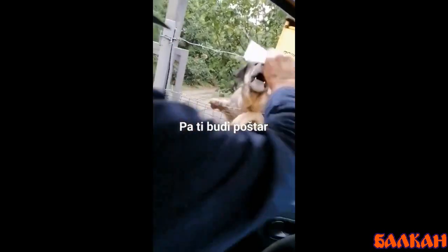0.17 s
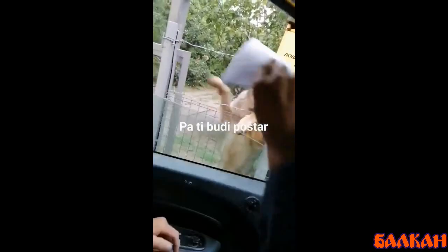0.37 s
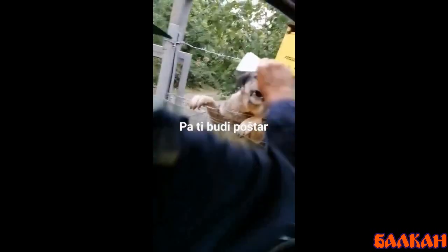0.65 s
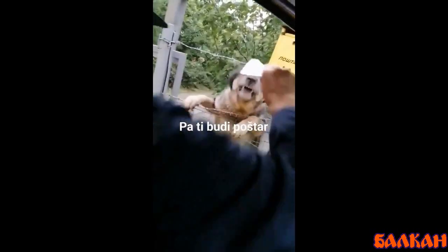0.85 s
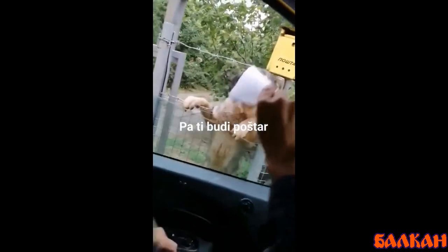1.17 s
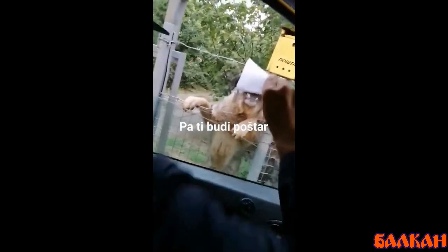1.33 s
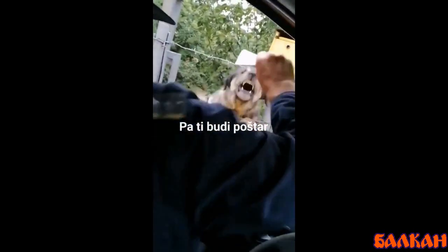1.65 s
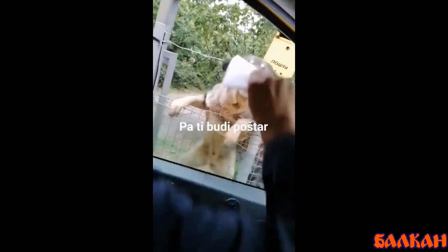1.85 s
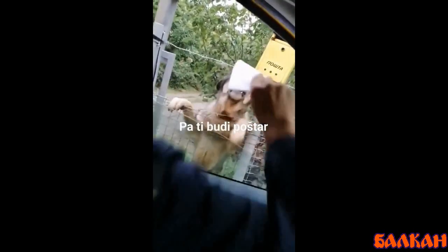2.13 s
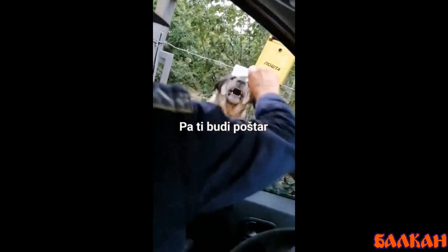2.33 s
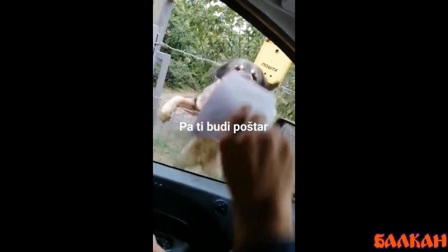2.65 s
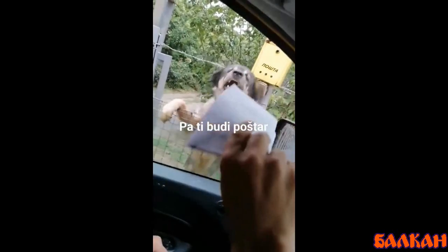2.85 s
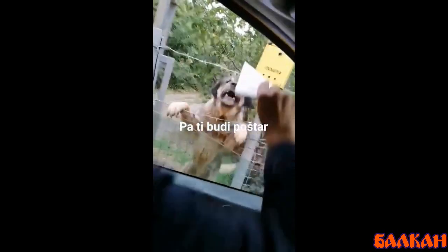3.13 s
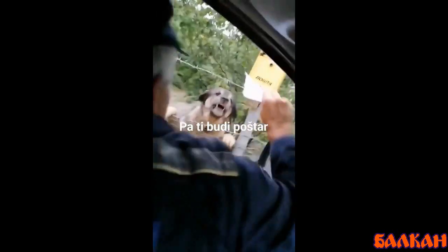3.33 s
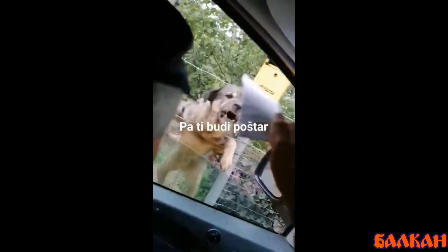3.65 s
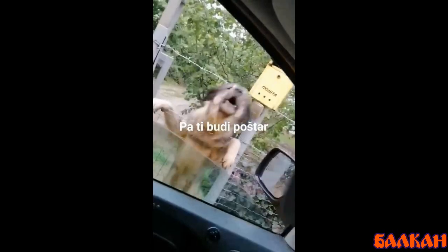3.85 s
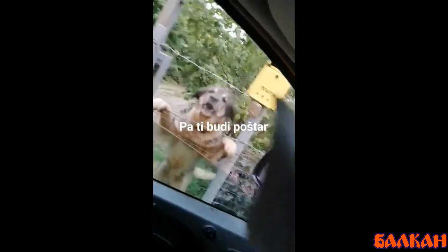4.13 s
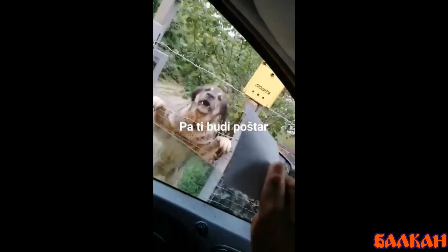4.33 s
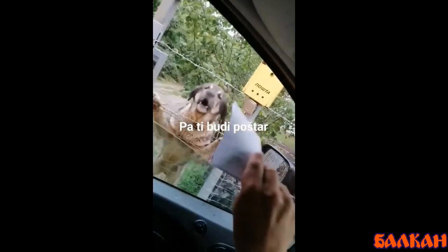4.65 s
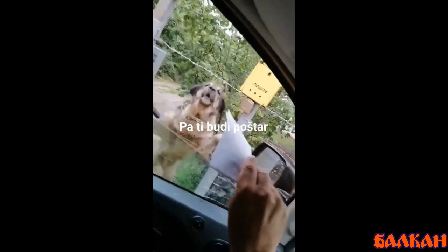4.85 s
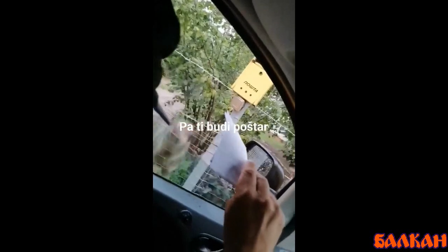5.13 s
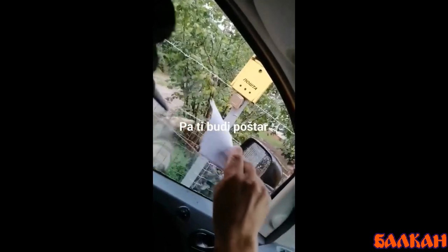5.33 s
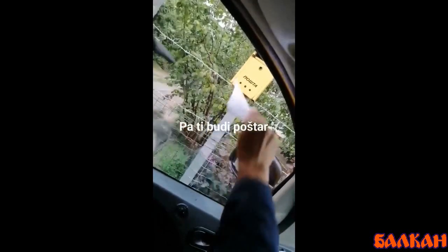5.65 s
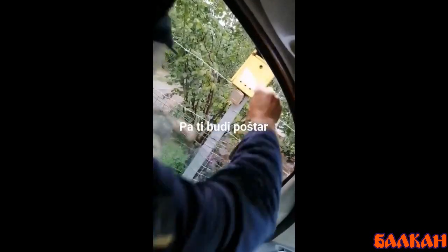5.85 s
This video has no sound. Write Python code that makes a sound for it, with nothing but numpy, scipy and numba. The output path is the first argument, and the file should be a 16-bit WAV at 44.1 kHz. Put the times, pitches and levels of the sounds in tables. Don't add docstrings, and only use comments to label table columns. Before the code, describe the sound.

A large dog snarls close outside the open window of an idling car. The first 0.3 seconds hold only quiet engine throb, street hiss and soft claw scrapes on wire. From 0.35 to 1.5 the growl surges in rough, uneven bursts, throat slapping and clicking, teeth hissing. After a short lull it returns from 1.8 to about 3.2, coarse and airy, with low falling gulps at 2.15 and 3.1 and small wire ticks around 2.7 and 2.9. Another growl builds from 3.4 into the first short, pitched bark at 3.9. Weaker grumbles follow, with a wire tick at 4.6, then barks at 4.85, 5.2 and 5.6, each about a sixth of a second, arching and dropping. The hand-held stereo phone catches tight cabin reflections; the dog's lows shift sides, often leaning left, loud peaks are rounded, and the background ducks beneath its voice.

```python
import sys
import numpy as np
from scipy import signal
from scipy.fft import rfft, irfft
from scipy.io import wavfile
from scipy.ndimage import uniform_filter1d, minimum_filter1d, map_coordinates
from numba import njit

SR = 44100
rng = np.random.default_rng(int(sys.argv[2]) if len(sys.argv) > 2 else 0)


def master(y):
    cut = np.clip(np.atleast_2d(y).T, -1, 1)
    pcm = np.round(cut * 32767)
    wavfile.write(sys.argv[1], SR, pcm.astype(np.int16))


def to_linear_factor(level_db):
    exponent = np.asarray(level_db, float) / 20
    return 10 ** exponent


N = 263718
TIME = np.arange(N) / SR

# (time [s], throat resonance [Hz], left over right [dB])
HEAD_MOVES = [(0.0, 477, 1.5), (0.28, 520, -1.0), (0.32, 550, 5.5), (0.68, 460, 12.5), (1.53, 543, 4.5),
              (1.58, 370, -1), (1.85, 570, 0.5), (2.27, 444, 13), (2.68, 545, 3), (2.71, 474, 5),
              (3.33, 514, 5), (3.36, 422, 1.5), (3.61, 520, 0.5), (3.93, 435, 6), (4.38, 464, -10),
              (4.96, 400, 3), (5.93, 401, 1), (5.98, 393, -12)]
# (centre [Hz], width [Hz], level [dB])
MOUTH_PEAKS = [(921, 130, 2), (1073, 69, 4), (1256, 124, -3), (1414, 240, -4)]
# (start [s], length [s], top pitch [Hz], level [dB], overtones [dB])
BARK_EVENTS = [
    (3.912, .16, 455, -9.5, -28),
    (4.856, 0.19, 432, -13.5, -20.5),
    (5.178, 0.17, 440, -12, -39),
    (5.623, 0.1604, 424, -11.5, -45),
]


def rms_one(x):
    return x / np.sqrt(np.mean(x ** 2) + 1e-20)


def in_time(rows):
    s, *columns = np.transpose(rows)
    return [np.interp(TIME, s, c) for c in columns]


def drift(rate):
    knots = rng.standard_normal(int(N / SR * 200) + 2)
    return np.interp(TIME * min(rate, 190), np.arange(len(knots)), knots)


def fade(start, end, edge=0.0098):
    return np.clip(np.minimum(TIME - start, end - TIME) / edge, 0, 1)


def filtered(x, order, hz, kind):
    return signal.sosfilt(signal.butter(order, hz, kind, fs=SR, output="sos"), x)


@njit
def moving_peak(x, cosine, r):
    y = np.zeros(len(x))
    for i in range(2, len(x)):
        push = (1 - r * r) / 2 * (x[i] - x[i - 2])
        y[i] = push + 2 * r * cosine[i] * y[i - 1] - r * r * y[i - 2]
    return y


def peak(x, hz, width):
    return moving_peak(x, np.cos(2 * np.pi * hz / SR) * np.ones(N), np.exp(-np.pi * width / SR))


def tract(x, peaks, shift=1):
    return sum((-1) ** k * to_linear_factor(level_db) * peak(x, hz * shift, width)
               for k, (hz, width, level_db) in enumerate(peaks))


def evened(x, span=0.029):
    size = int(span * SR)
    return x / np.sqrt(uniform_filter1d(uniform_filter1d(x ** 2, size), size) + 1e-12)


def tone(hz, levels, wobble, rough_db):
    turn = 2 * np.pi * np.cumsum(hz * (1 + wobble * drift(90))) / SR
    return sum(to_linear_factor(db + rough_db * (k + 3) * drift(120)) * np.sqrt(2) * np.sin((k + 1) * turn)
               for k, db in enumerate(levels))


def engine():
    # (time [s], level [dB])
    idle_levels = [(0.0, -40), (0.05, -34), (0.64, -42), (0.93, -31.5), (1.04, -41.5), (1.36, -39), (1.44, -46),
                   (1.71, -40), (1.87, -44), (2.31, -42), (2.34, -40), (2.9, -39), (3.07, -47), (3.63, -36.5),
                   (3.7, -30.5),
                   (4.2, -50), (4.58, -37), (5.2, -45)]
    # (multiple of firing rate [1], level [dB])
    order_levels = [(2, -15), (3, -15), (4, -54.5), (5, -34)]
    firing_hz = 33.1
    level_db = in_time(idle_levels)[0]
    turn = 2 * np.pi * np.cumsum(firing_hz * (1 + 0.017 * drift(16))) / SR
    orders = sum(to_linear_factor(db + 3.1 * drift(6.3)) * np.sin(k * turn + k) for k, db in order_levels)
    boom = to_linear_factor(1.0 * drift(22)) * np.sin(turn + np.array([[.15], [-.15]]))
    noise = filtered(rng.standard_normal((2, N)), 2, [38, 150], "band")
    rumble = rms_one(noise[0] + 0.17 * noise[1] * [[1], [-1]])
    return to_linear_factor(level_db) * (np.sqrt(2) * (boom + orders) + to_linear_factor(-6.0) * rumble)


def outside_air():
    # (frequency [Hz], density [dB per Hz])
    spectrum = [(26, -47), (45, -26), (149, -10), (553, -12), (2100, -16), (3100, -65.5), (3650, -37.5),
                (5390, -18), (8350, -25.5), (11000, -89.5), (14300, -125), (22000, -120)]
    level_db = -25 - 23.0
    hz = np.fft.rfftfreq(N, 1 / SR) + 1
    points = np.array(spectrum)
    shape = to_linear_factor(np.interp(np.log(hz), np.log(points[:, 0]), points[:, 1]))
    return to_linear_factor(level_db) * rms_one(irfft(rfft(rng.standard_normal((2, N))) * shape, N))


def folds():
    # (time [s], rate [slaps per s], breath share [0-1])
    slap_rates = [(0, 60, .8), (.33, 55, .2), (.75, 45, .2), (1.25, 60, .25), (1.6, 60, .8), (1.8, 65, .2),
                  (2.9, 62, .25), (3.3, 60, .7), (3.7, 80, .3), (3.92, 150, .6), (4.15, 60, .6),
                  (4.4, 40, .2), (4.8, 60, .3), (4.9, 150, .6), (5.98, 120, .6)]
    per_s, breath = in_time(slap_rates)
    cycle = np.cumsum(per_s * to_linear_factor(3.5 * drift(60))) / SR
    slaps = np.diff(np.floor(cycle), prepend=0) * to_linear_factor(2.8 * drift(110))
    r = np.exp(-1 / (.004 * SR))
    puffs = rms_one(signal.lfilter([1], [1, -2 * r, r * r], slaps + 1e-18))
    return slaps, puffs, np.clip(breath, 0, 1)


def pushes(rows, rise, fall, rest_db):
    own, other = to_linear_factor(rest_db) ** 2
    for s, held, level_db, other_db in rows:
        before, after = np.clip(s - TIME, 0, 1), np.clip(TIME - s - held, 0, 1)
        power = to_linear_factor(level_db - rise * before - fall * after) ** 2
        own = own + power
        other = other + power * to_linear_factor(other_db) ** 2
    return 10 * np.log10(own), 10 * np.log10(other)


def hard_slaps():
    # (time [s], peak level [dB])
    slap_events = [(0.506, -6), (0.536, -18), (0.595, -12.5), (0.877, -16), (1.015, -3), (1.14, -9),
                   (1.203, -4.5), (1.767, -14), (1.846, -6), (2.009, -17), (2.916, -33), (3.119, -26),
                   (3.422, -34), (3.492, -30), (3.637, -23), (3.727, -5), (3.845, -14), (3.888, 1),
                   (4.334, -36), (4.365, -19.5), (4.437, -16), (4.772, -29), (4.812, -12.5), (4.844, -23),
                   (5.184, -17), (5.271, -10), (5.467, -46), (5.602, -33), (5.627, -29)]
    clicks = np.full(N, 1e-18)
    clicks[[round(s * SR) for s, _ in slap_events]] = to_linear_factor(np.array(slap_events)[:, 1] + 36)
    return clicks


def snarl(lock):
    # (centre [Hz], width [Hz], level [dB])
    chest_peaks = [(228, 36, -7.5), (346.5, 76, -11.5), (687, 69, -11.5)]
    muzzle_peaks = [(1550, 140, -21), (1787, 160, 23.5), (2733, 740, 18), (2820, 223, 22),
                    (3033, 980, 10.5)]
    teeth_peaks = [(4030, 700, -15), (4130, 270, -21), (4930, 320, -4.5), (5264, 1070, 9.5),
                   (5410, 1370, -3), (6100, 1300, -13), (6820, 2100, 2.5), (8150, 640, 2),
                   (9920, 706, -4.5), (9930, 366, -2.5)]
    # (start [s], held [s], throat level [dB], open mouth over throat [dB])
    growl_pushes = [(.345, 0.14, -19, -7.5), (.48, 0.061, -16.5, -11.5), (.61, 0.096, -22.5, -10.5),
                    (.72, 0.17, -25, -10.5), (.88, 0.051, -21.5, -8.5), (.95, 0.077, -15.5, -8),
                    (1.07, 0.17, -19, -6.5), (1.26, 0.035, -36, 5), (1.38, 0.089, -25, -6.5),
                    (1.8, .15, -18.5, -8.5), (2.0, .33, -20, -10), (2.35, 0.11, -19, -11.5),
                    (2.5, 0.085, -20.5, -13.5), (2.58, 0.074, -15.5, -10), (2.7, 0.14, -21, -9.5),
                    (2.92, 0.085, -21, -3), (3.04, .14, -27, 0.5), (3.42, 0.21, -26, -27),
                    (3.64, 0.449, -15.5, -14.5), (3.86, 0.16, -15, -11.5), (4.17, 0.024, -39, -20),
                    (4.31, 0.095, -33, -15), (4.43, 0.021, -26, -13), (4.74, 0.13, -29, -25),
                    (4.85, 0.17, -13.5, -14), (5.04, 0.046, -28, -26), (5.19, 0.14, -12, -22),
                    (5.35, .23, -32.5, -51), (5.63, 0.14, -11, -27.5), (5.79, 0.058, -31.5, -34)]
    # (start [s], held [s], teeth level [dB], muzzle over teeth [dB])
    air_rushes = [(.1, 0.22, -46, 0), (.33, 0.22, -41, 2), (.62, 0.053, -40.5, -1), (.75, 0.13, -48, 0.5),
                  (.93, .1, -43.5, 1.5), (1.1, 0.042, -37, 4), (1.23, 0.062, -33, 0),
                  (1.38, 0.11, -31.5, -3), (1.8, 0.14, -35.5, -2.5), (2.0, 0.31, -40, 1),
                  (2.3, 0.076, -34, -3), (2.45, 0.23, -44.5, -2), (2.66, .16, -34, -1),
                  (2.93, 0.067, -29, -4), (3.03, 0.21, -32, -2.5), (3.4, 0.27, -50, 0),
                  (3.66, 0.19, -36.5, 1.5), (3.88, 0.16, -37, 4), (4.13, 0.048, -42.5, -17),
                  (4.31, 0.22, -42.5, -2), (4.87, 0.11, -37, -1), (5.1, 0.024, -51, -20),
                  (5.19, 0.1, -36.5, -3), (5.36, 0.025, -63, -9.5), (5.64, 0.11, -46, -0.5)]
    # (time [s], level [dB])
    chest_turn = [(3.9, 0.6), (4.0, -13.5)]
    throat_db, mouth_db = pushes(growl_pushes, rise=596, fall=791, rest_db=(-48, -64.5))
    teeth_db, muzzle_db = pushes(air_rushes, rise=309.5, fall=243, rest_db=(-63.5, -58.5))
    slaps, puffs, breath = folds()
    air = rng.standard_normal(N)
    jaw = 1 + 0.039 * drift(5)

    def drive(slap, puff):
        return (1 - breath) * (slap * rms_one(slaps) + puff * puffs * air) + breath * air

    low = drive(.65, .8)
    throat_hz = in_time(HEAD_MOVES)[0] * (1 + .3 * lock)
    throat = peak(peak(low, throat_hz * (1 + .06 * drift(30)), 140), throat_hz, 300)
    throat = throat + (1 - lock) * to_linear_factor(in_time(chest_turn)[0]) * tract(low, chest_peaks, jaw)
    throat = filtered(throat, 2, [170, 900], "band")
    mouth = peak(tract(drive(.45, .8), MOUTH_PEAKS, jaw * (1 + .05 * lock)), 1150, 1100)
    muzzle = peak(tract(drive(.15, .6), muzzle_peaks, jaw), 2400, 2400)
    teeth = filtered(tract(drive(.1, .4), teeth_peaks, jaw ** .4), 2, 3300, "high")
    parts = to_linear_factor(throat_db - 8.8 * lock) * evened(throat)
    parts = parts + to_linear_factor(mouth_db + 2.5) * evened(mouth)
    parts = parts + to_linear_factor(muzzle_db + 4.5) * evened(muzzle)
    parts = parts + to_linear_factor(teeth_db + 4.0) * evened(teeth)

    clicks = hard_slaps()
    hard = peak(peak(clicks, throat_hz, 130), throat_hz, 890)
    hard = hard + to_linear_factor(-23.5) * tract(clicks, MOUTH_PEAKS, jaw)
    shut = np.convolve(clicks > 1e-9, np.hanning(900))[800:N + 800]
    return (1 - .6 * shut) * parts + hard


def fence():
    # (time [s], peak level [dB], fade [s], left over right [dB], lowest frequency [Hz])
    claw_ticks = [
        (.125, -36, .07, 2, 3000),
        (.2, -38, .05, 2, 3000),
        (2.67, -34, .03, 3, 9000),
        (2.91, -31, .015, 0, 3000),
        (3.342, -36, .035, 12, 7600),
        (4.592, -27, .016, -6, 4500),
    ]
    out = 0
    for s, level_db, fade_s, lean_db, low_hz in claw_ticks:
        age = np.clip(TIME - s, 0, None)
        shape = to_linear_factor(level_db + lean_db * np.array([[.5], [-.5]])) * np.minimum(age / .005, 1)
        shape = shape * np.exp(-age / fade_s)
        out = out + shape * filtered(rng.standard_normal((2, N)), 3, [low_hz, 10800], "band")
    return out


def gulp(s, length, first_hz, last_hz, level_db):
    edge_db = -13.5
    rows = [(s + share * length, first_hz + share * (last_hz - first_hz), level_db + edge * edge_db)
            for share, edge in ((0, 0.75), (.3, 0.18), (.75, 0), (1, 1))]
    hz, hum_db = in_time(rows)
    return fade(s, s + length) * tone(hz, [hum_db], 0.01, 1.44)


def bark(s, length, top_hz, level_db, third_db):
    # (share of length [0-1], pitch over top [1], level [dB], overtones [dB], cheeks [dB])
    arch = [
        (0, .9, -5, -9, -33),
        (.2, .97, -1.5, -1.5, -23),
        (.42, 1, 0, 0, -22),
        (.68, .955, -2, -1.5, -17),
        (.86, .885, -7, -7, -21),
        (1, .82, -20, -19, -33),
    ]
    second_db, cheek_top_hz = -1.5, 720
    rows = [(s + share * length, top_hz * pitch, level_db + db, third_db + second_db + over_db,
             third_db + over_db, cheek_top_hz * pitch ** .5, air_db)
            for share, pitch, db, over_db, air_db in arch]
    hz, *levels, cheek_hz, cheek_db = in_time(rows)
    levels += [levels[-1] - 20.5, levels[-1] - 19.5]
    cheeks = peak(peak(rng.standard_normal(N), cheek_hz, 60), cheek_hz, 130)
    voice = tone(hz, levels, 0.00804, rough_db=.7)
    return fade(s, s + length) * (voice + to_linear_factor(cheek_db) * evened(cheeks, 0.1))


def dog():
    # (start [s], length [s], first pitch [Hz], last pitch [Hz], level [dB])
    gulp_events = [
        (2.146, .13, 219.6, 163, -30.5),
        (3.089, 0.2, 224.8, 97, -31.5),
        (3.394, 0.15, 99.7, 103, -37.5),
        (3.635, 0.087, 85, 82.6, -31),
    ]
    lock = sum(fade(s, s + length + .03, .03) for s, length, *_ in BARK_EVENTS)
    return snarl(lock) + sum(gulp(*g) for g in gulp_events) + sum(bark(*b) for b in BARK_EVENTS)


def cabin(x, wet_db=-2.0, t60=0.12, far_db=-26, far_t60=0.33, count=12):
    t = TIME[:SR // 2]
    out = np.zeros((2, N + SR))
    far = rng.standard_normal((2, len(t))) * to_linear_factor(-60 * t / far_t60) * (t > .03)
    step = N // count + 1
    for k in range(count + 1):
        near = rng.standard_normal((2, len(t))) * (t > .0007)
        near = near * (rng.random((2, len(t))) < .08) * to_linear_factor(-60 * t / t60)
        near = filtered(near, 1, 1800, "high")
        reply = to_linear_factor(wet_db) * rms_one(near) + to_linear_factor(far_db) * rms_one(far)
        start, stop = max((k - 1) * step, 0), min((k + 1) * step, N)
        piece = x[start:stop] * (1 - np.abs(np.arange(start, stop) / step - k))
        wet = signal.fftconvolve(piece[None], reply / np.sqrt(len(t)), axes=1)
        out[:, start:start + wet.shape[1]] += wet
    return out[:, :N]


def ducking(voice, knee_db=-27, ratio=0.4):
    level_db = 10 * np.log10(uniform_filter1d(voice ** 2, int(0.072 * SR)) + 1e-12)
    held_db = np.maximum.accumulate(level_db + 45 * TIME) - 45 * TIME
    return to_linear_factor(-ratio * np.clip(held_db - knee_db, 0, 30))


def scene():
    # (time [s], lag [ms])
    right_lag = [(0, 0.55), (3.3, 0.39), (3.6, 0.18), (5.98, 0.12)]
    voice = dog()
    lean_db = np.clip(in_time(HEAD_MOVES)[-1], -8, 12)
    lag = (in_time(right_lag)[0] + 0.02 * drift(4.7)) * SR / 1000
    ports = np.array([voice, map_coordinates(voice, [np.arange(N) - lag], order=3)])
    lows = filtered(ports, 1, 1100, "low")
    direct = lows * to_linear_factor([lean_db / 2, -lean_db / 2]) + (ports - lows) * to_linear_factor([[-1.5], [1.5]])
    idle = ducking(voice, knee_db=-19, ratio=1.9) * engine()
    street = ducking(voice) * outside_air()
    return idle + street + to_linear_factor(-5.5) * direct + fence() + cabin(voice)


def swaying(spec, hz, depth=1.4, from_hz=1200):
    field = rng.standard_normal((2,) + spec.shape)
    field = uniform_filter1d(uniform_filter1d(field, size=11, axis=2), size=16, axis=3)
    field = (field[0] + 1j * field[1]) / field.std() / np.sqrt(2)
    share = depth * hz[:, None] / (hz[:, None] + from_hz)
    return spec * (1 + share * field) / np.sqrt(1 + share ** 2)


def starved_bands(x, valley_db=8.0, quiet_db=-84, loose_db=8.0):
    hz, _, spec = signal.stft(x, SR, nperseg=2048, noverlap=1536)
    spec = swaying(spec, hz)
    bands = (np.abs(spec[:, :1024]) ** 2).reshape(2, 128, 8, -1).mean(axis=2)
    level_db = 10 * np.log10(uniform_filter1d(bands, 5, axis=2) + 1e-16)
    below_db, above_db = (-minimum_filter1d(-level_db, size=9, axis=1, origin=side) for side in (4, -4))
    luck = uniform_filter1d(rng.standard_normal(bands.shape[1:]), 6, axis=1) * np.sqrt(6)
    high = hz[4:1024:8, None]
    limit_db = np.minimum(below_db, above_db) - valley_db - 5.0 * (high < 3000) + loose_db * luck
    valley = (level_db < limit_db) & (high > 1100)
    faint = (level_db < quiet_db + 3.0 * luck) & (high > 7500)
    spec[:, :1024] *= np.repeat(np.where(valley | faint, .03, 1), 8, axis=1)
    return signal.istft(spec, SR, nperseg=2048, noverlap=1536)[1][:, :N]


def top_cut(x):
    return signal.sosfilt(signal.butter(12, 12470, fs=SR, output="sos"), x)


def record(dry):
    dipped = np.array([.45 * peak(c, 6150, 300) + .7 * peak(c, 7750, 300) for c in dry])
    flat = dry - dipped
    flat = flat - np.array([0.42 * peak(c, 3565, 1070) for c in flat])
    top = signal.sosfiltfilt(signal.butter(4, 7740, "high", fs=SR, output="sos"), flat)
    port_db = np.array((4, -6))
    ports = flat + top * (to_linear_factor(port_db) - 1)[:, None]
    cut = filtered(0.91 * np.tanh(ports / 0.86), 6, 10500, "low")
    return top_cut(starved_bands(cut))


dry = scene()
out = record(dry)
master(out)
```